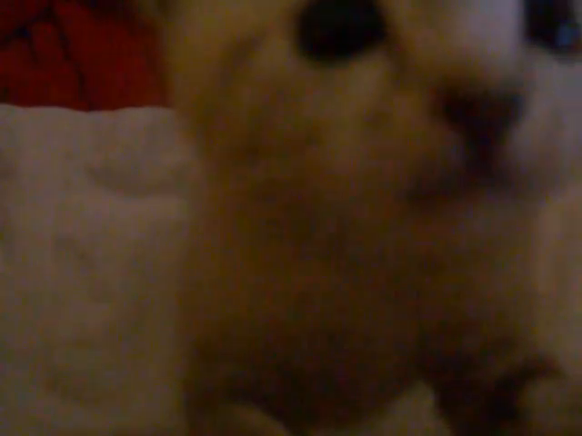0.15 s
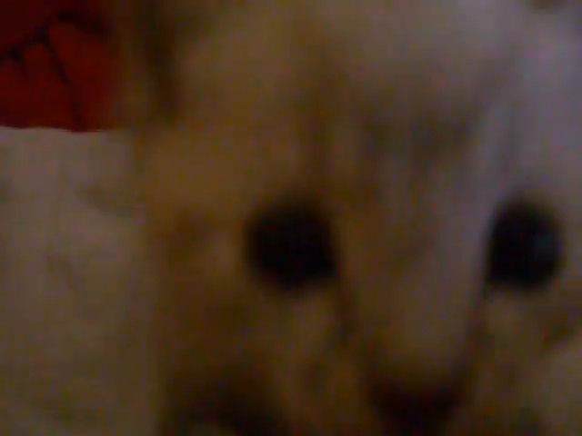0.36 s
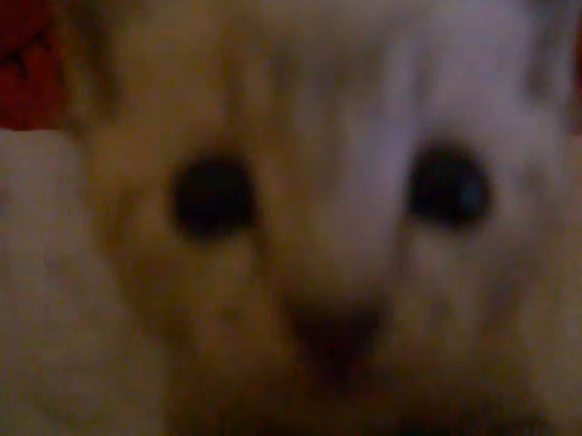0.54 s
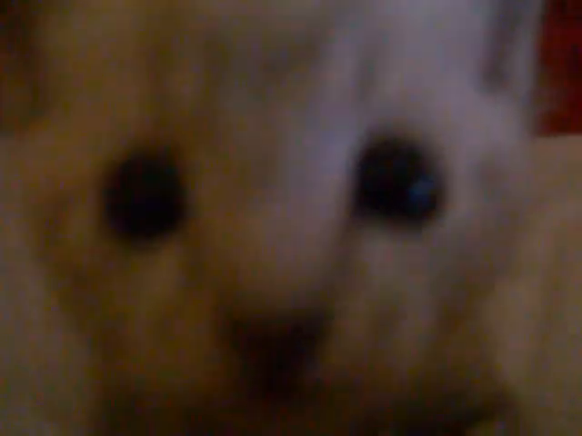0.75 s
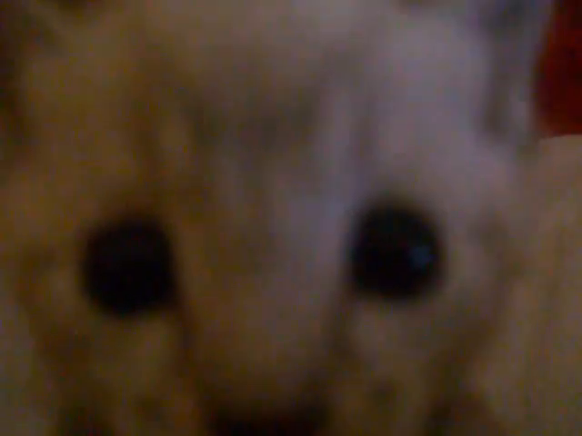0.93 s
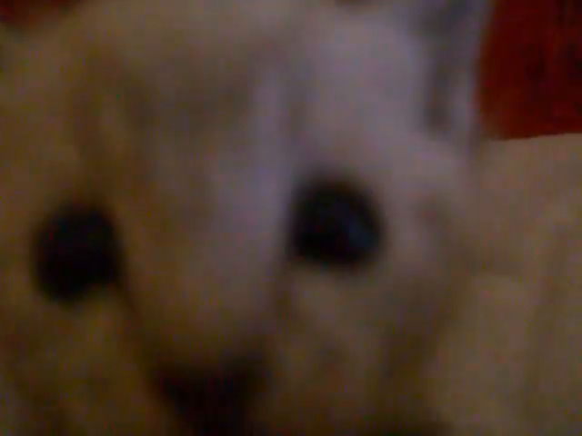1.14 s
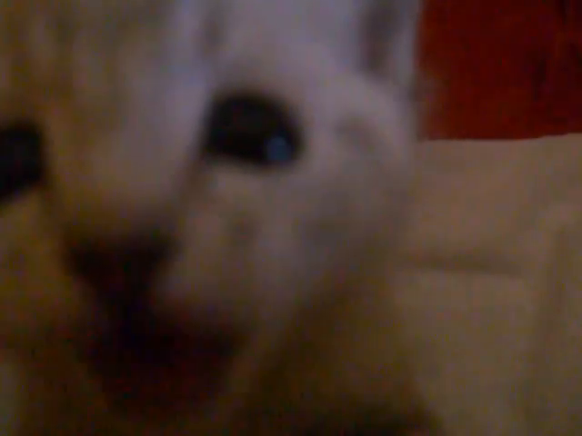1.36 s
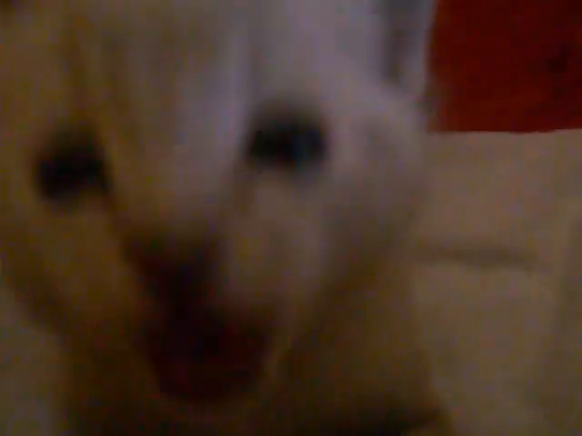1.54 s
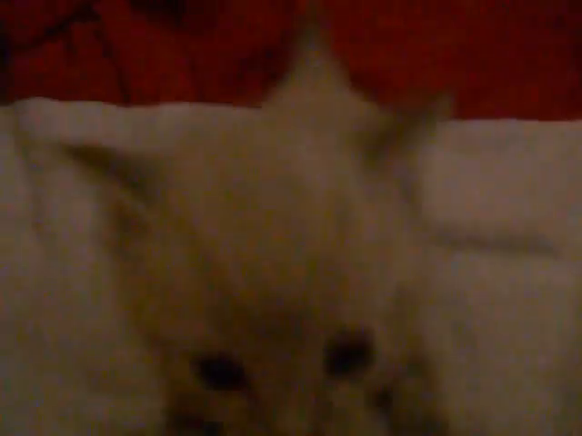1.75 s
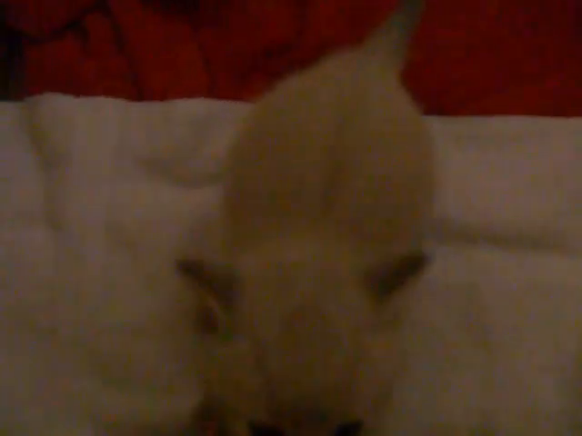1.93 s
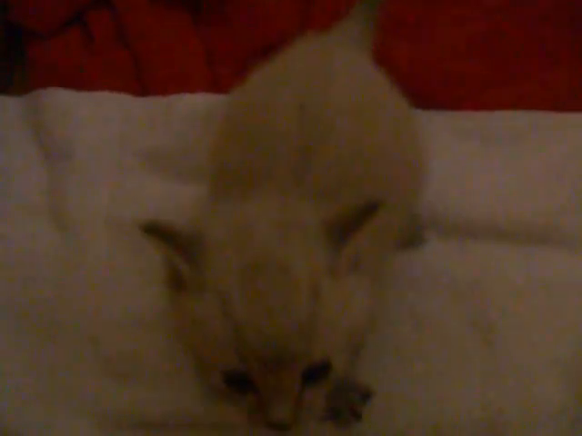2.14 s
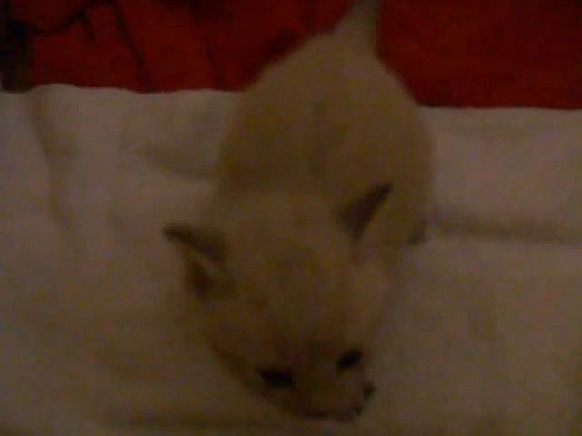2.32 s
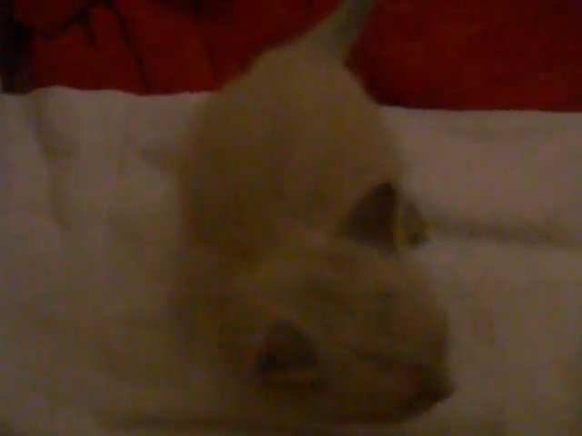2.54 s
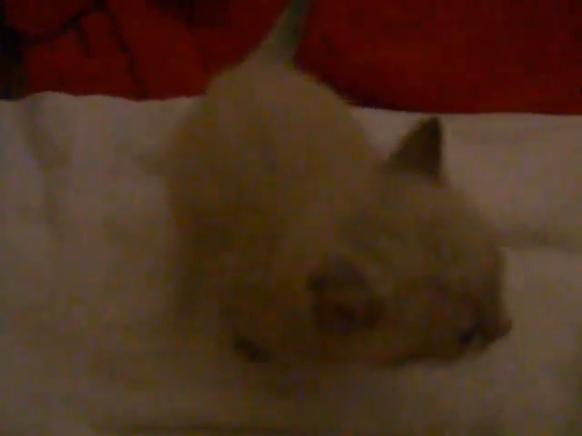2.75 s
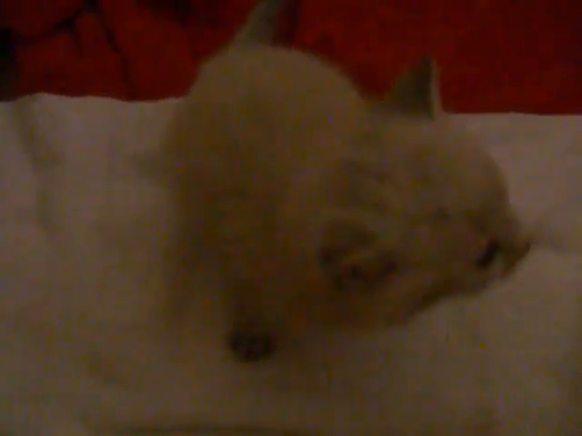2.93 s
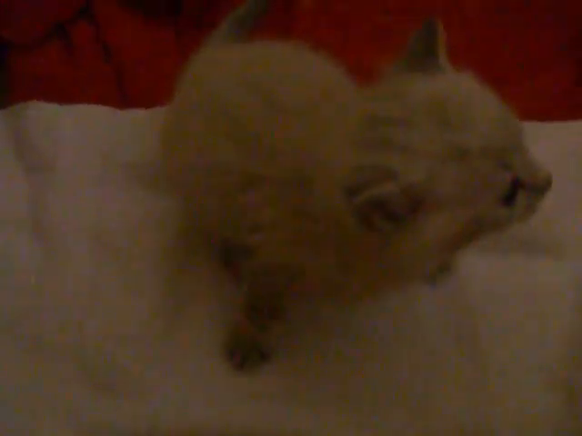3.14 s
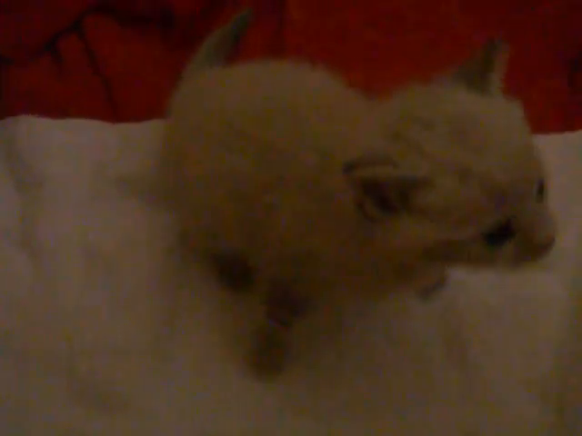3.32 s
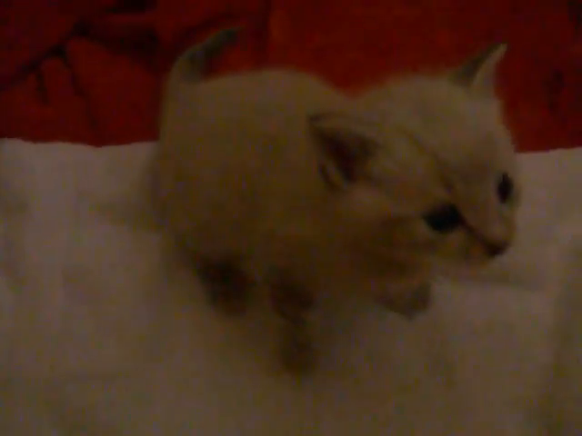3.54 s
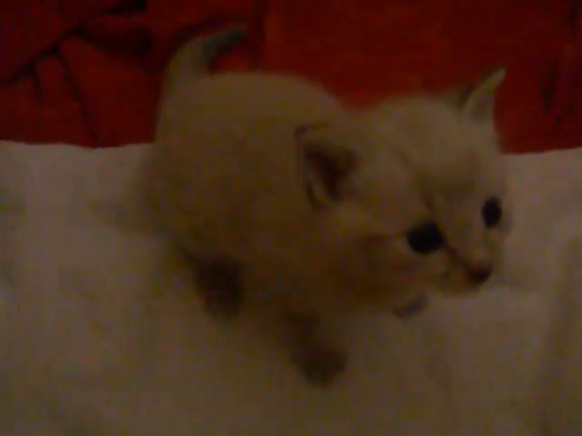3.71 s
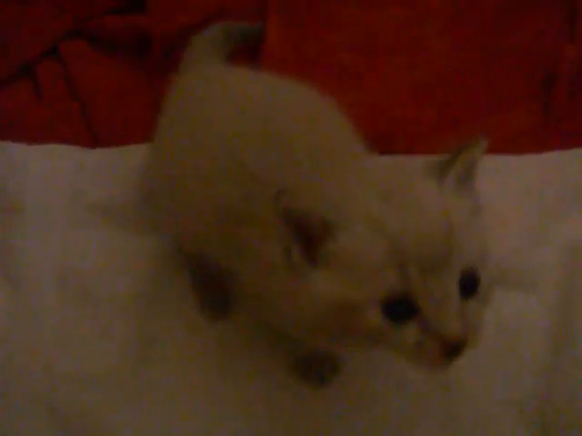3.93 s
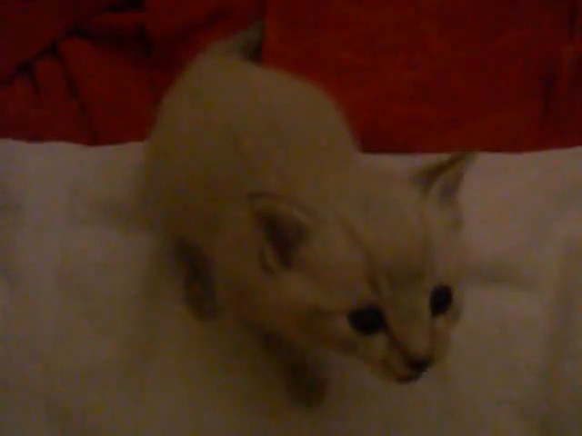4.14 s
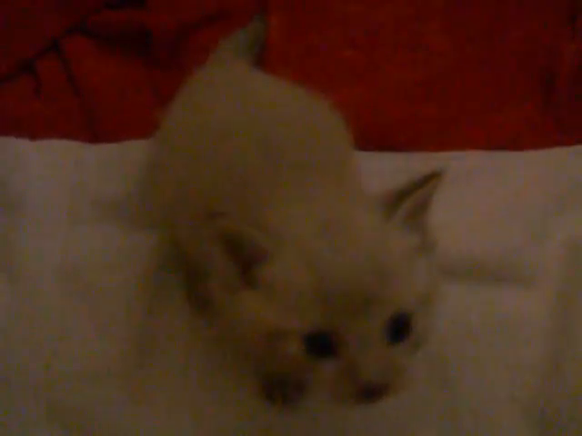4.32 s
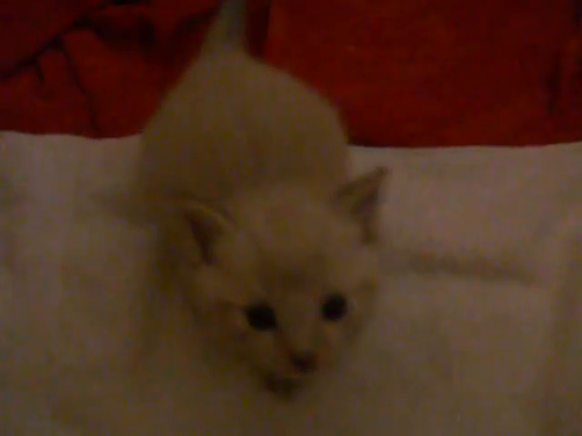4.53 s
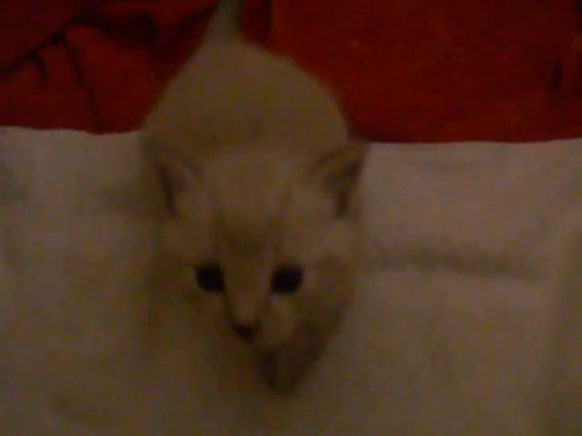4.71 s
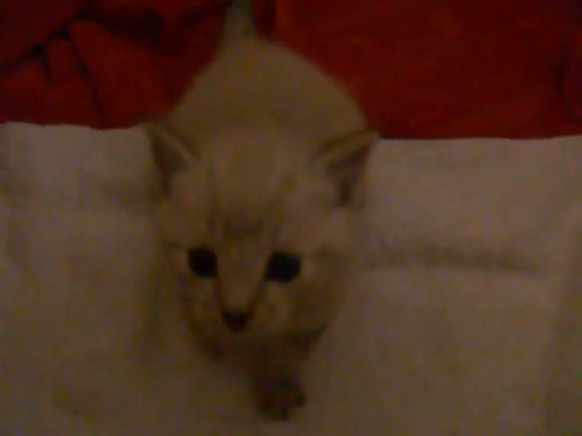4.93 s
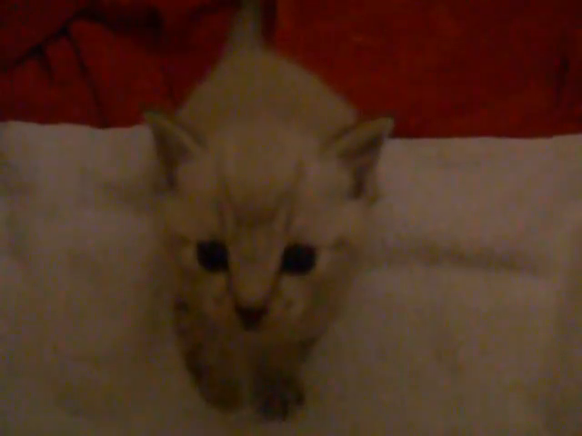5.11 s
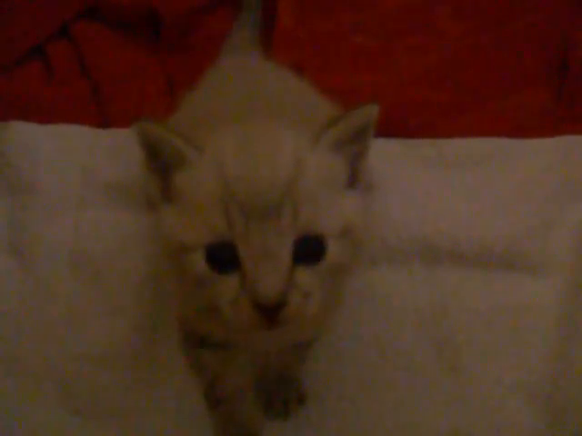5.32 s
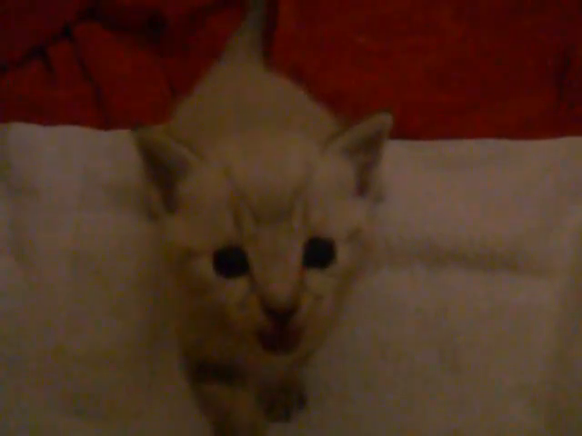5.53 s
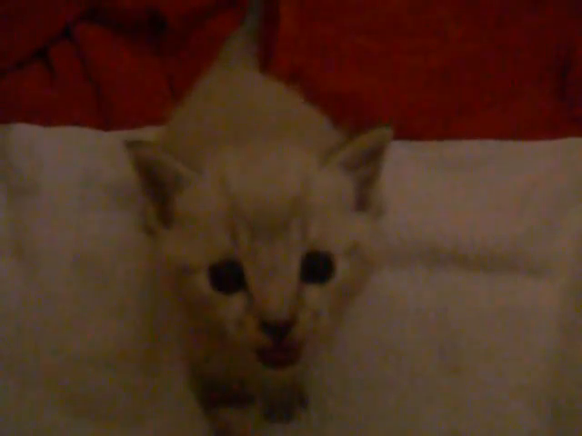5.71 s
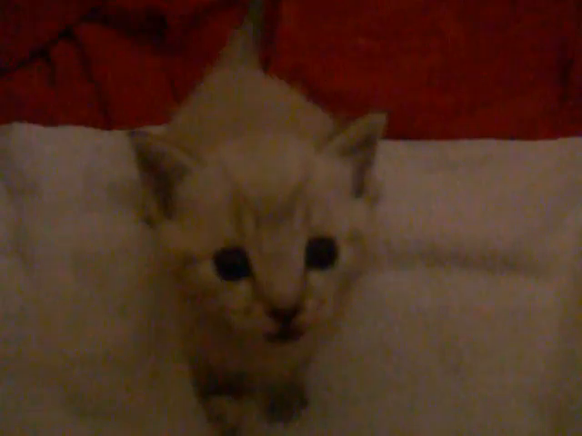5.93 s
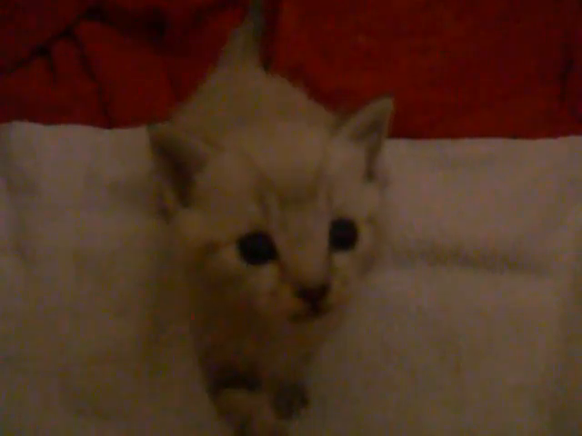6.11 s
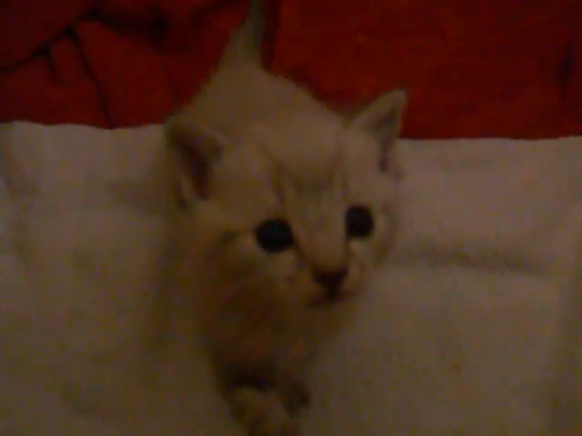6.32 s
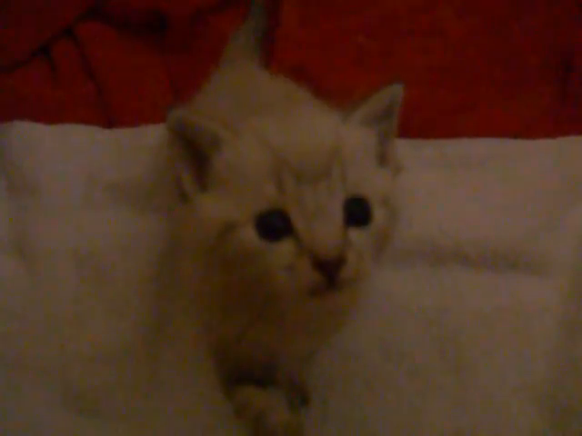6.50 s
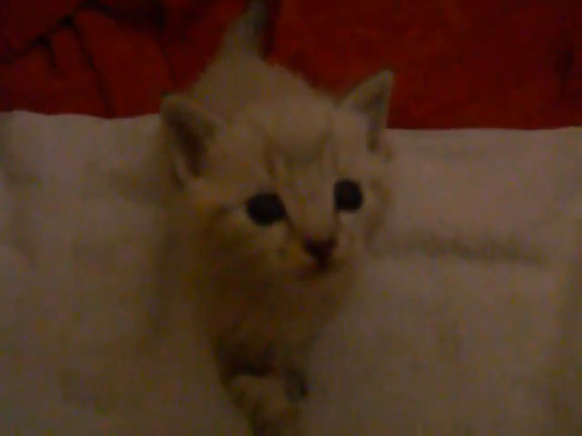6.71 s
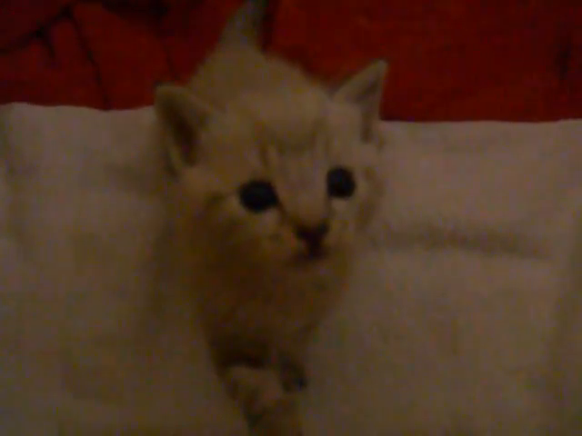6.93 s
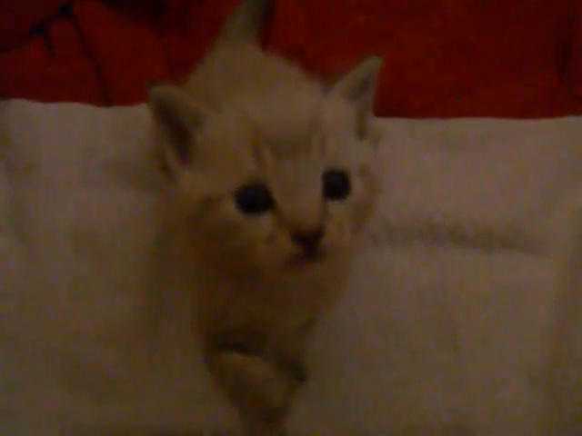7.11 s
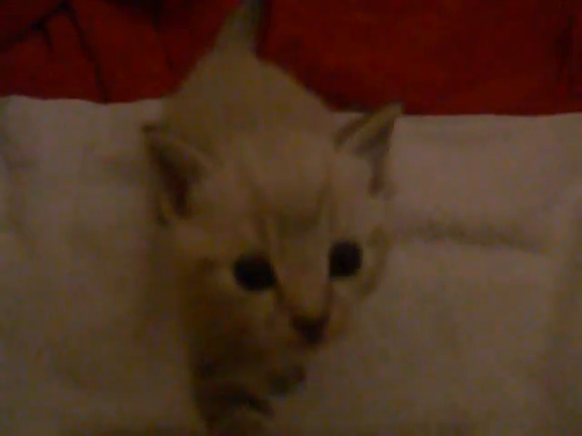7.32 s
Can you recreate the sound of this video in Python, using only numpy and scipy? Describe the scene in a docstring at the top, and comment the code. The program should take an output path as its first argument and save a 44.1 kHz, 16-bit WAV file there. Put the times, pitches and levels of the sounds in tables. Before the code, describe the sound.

Fur and cloth rustle and bump against the microphone, then a young kitten gives four thin, high mews over low hum and hiss.

```python
"""Fur and cloth brush and bump close by, over a low hum and hiss; then a young kitten mews four times
on a towel in a box, the first time right at the microphone. Friction is shaped noise and contacts are
decaying noise bursts. The voice is a harmonic series on an arching pitch: each mew is a thin, clean
arch that breaks into a rasp of side tones and runs out as a puff of fluttering, coloured air."""
import sys
import numpy as np
from scipy import signal
from scipy.fft import rfft, irfft
from scipy.io import wavfile
from scipy.ndimage import uniform_filter1d

SR = 44100
rng = np.random.default_rng(int(sys.argv[2]) if len(sys.argv) > 2 else 0)


def master_out(mix):
    """Clip the mix to full scale and print it as 16-bit PCM to the path in sys.argv[1]."""
    frames = np.transpose(np.atleast_2d(mix))
    ceiling = np.clip(frames, -1, 1)
    pcm = np.round(ceiling * 32767).astype(np.int16)
    wavfile.write(sys.argv[1], SR, pcm)


N = 328983
TIME, FREQ = np.arange(N) / SR, np.fft.rfftfreq(N, 1 / SR)
EDGE_HZ = 15900  # upper band limit


def amp(db):
    """Logarithmic level: decibels to amplitude gain."""
    return 10 ** (np.asarray(db) / 20)


def unit(x):
    """Normalisation: scales a signal to rms 1."""
    return x / np.sqrt(np.mean(x ** 2) + 1e-20)


def read(points, hz):
    """Spectral envelope: gain at the given frequencies, interpolated in dB over log frequency."""
    f, db = np.transpose(points)
    return amp(np.interp(np.log(hz + 1), np.log(f + 1), db))


def colour(x, points):
    """Linear filtering: multiplies the spectrum of x by an envelope, then scales to rms 1."""
    return unit(irfft(rfft(x) * read(points, FREQ), N))


def noise():
    """White noise: equal power at every frequency."""
    return rng.standard_normal(N)


def wander(hz):
    """Random modulation: noise under a Gaussian low-pass of the given rate, at rms 1."""
    return unit(irfft(rfft(noise()) * np.exp(-(FREQ / hz) ** 2), N))


def gate(start, end, edge):
    """Time window: one between two times, with short linear ramps."""
    return np.clip(np.minimum(TIME - start, end - TIME) / edge + .5, 0, 1)


def press(start, end, attack, release, arch_db=0, swell_db=0):
    """Exponential growth and decay: 60 dB in attack and release times, with an arched or swelling hold."""
    progress = np.clip((TIME - start) / (end - start), 0, 1)
    hold_db = swell_db * (progress - 1) - arch_db * (2 * progress - 1) ** 2
    away = np.maximum((start - TIME) / attack, (TIME - end) / release)
    return amp(hold_db - 60 * np.clip(away, 0, 2))


def dying(start, decay):
    """Damped impact: a 0.4 ms rise on an exponential decay of 60 dB in the decay time."""
    age = np.maximum(TIME - start, 0)
    return np.minimum(age / .0004, 1) * amp(-60 * np.minimum(age / decay, 2))


# colour of the steady rumble and hiss: (frequency [Hz], relative level [dB])
FLOOR_COLOUR = [(20, -17), (50, -6.5), (100, -6), (170, -4), (300, -11), (550, -12.5), (1200, -20.5),
                (1900, -23), (3000, -27.5), (6000, -30.5), (12200, -32), (13600, -23.5), (14800, -26.5),
                (15400, -24)]
# hum lines of the room: (frequency [Hz], width [Hz], level [dB], start [s])
HUM_LINES = [(57, 8.4, -62.5, 0), (128.8, 6.7, -54, 1), (163.7, 3.5, -55.5, 3.3), (254, 4.99, -54, 5.5),
             (259, 6, -61, 7), (366, 24.6, -57.5, 10)]
FLOOR_DB = -50


def background(waver=0.4):
    """Broadband noise plus narrowband lines: random frequency modulation gives each hum its width."""
    out = amp(FLOOR_DB) * colour(noise(), FLOOR_COLOUR)
    for hz, width, db, start in HUM_LINES:
        phase = 2 * np.pi * np.cumsum(hz + width / 2 * wander(width)) / SR
        line = np.sin(phase) * (1 + waver * wander(9.6))
        out += amp(db) * unit(line) * np.clip((TIME - start) / 0.011, 0, 1)
    return out


def box(x, wet_db=-22, t60=0.17):
    """Reverberation: convolution with decaying noise gives the padded box its faint, short tail."""
    t = np.arange(SR // 4) / SR
    tail = rng.standard_normal(len(t)) * amp(-60 * t / t60) * (t > .002)
    return x + amp(wet_db) * signal.fftconvolve(x, tail / np.linalg.norm(tail))[:N]


# sharp snags of cloth and claw: (time [s], level [dB], 60 dB decay [s])
SNAGS = [(0.272, -26, 0.02), (0.344, -31, 0.031), (0.37, -16.5, 0.0045), (.47, -25, 0.016),
         (.701, -34, 0.013), (.771, -54, .01), (0.795, -27, 0.01), (0.895, -17, 0.0038), (.963, -28, .005),
         (0.98, -21, 0.0079), (1.137, -22.5, 0.0066), (1.168, -31, 0.012), (1.909, -45, .012),
         (2.792, -30, 0.005), (7.251, -17, 0.015), (7.2566, -19.5, .012), (7.325, -35, .01),
         (7.343, -46, 0.021)]
# soft bumps on the housing: (time [s], level [dB], 60 dB decay [s], upper cutoff [Hz])
SOFT_BUMPS = [(0.474, -34.5, 0.23, 132), (0.496, -43, 0.16, 150), (0.795, -18.5, 0.023, 665),
              (0.802, -33, 0.38, 88), (0.813, -31.5, 0.24, 445), (7.249, -62, 0.09, 380),
              (7.29, -38.5, 0.2, 112)]


def knocks():
    """Impact excitation: sharp snags are broadband bursts, dull bumps are low-frequency bursts."""
    snag_colour = [(200, 4.0), (1500, -6.5), (4200, 1.5), (8000, -6.5), (13000, 1), (16000, 2.5)]  # Hz, dB
    snags = sum(amp(db) * dying(start, decay) for start, db, decay in SNAGS)
    out = snags * colour(noise(), snag_colour)
    for start, db, decay, top_hz in SOFT_BUMPS:
        band = signal.butter(2, [36, top_hz], "band", fs=SR, output="sos")
        thud = signal.sosfilt(band, noise())
        out += amp(db) * dying(start, decay) * unit(thud)
    return out


# short dry scrapes beside the housing: (start [s], end [s], level [dB])
DRY_SCRAPES = [(7.257, 7.261, -29.5), (7.275, 7.295, -30.5), (7.339, 7.369, -36.5), (7.399, 7.413, -44.5)]
# colour of the scrapes: (frequency [Hz], relative level [dB])
DRY_SCRAPE_COLOUR = [(180, -46), (300, 10), (546, -9), (994, -1.5), (1580, -14), (2170, -5), (2840, -14),
                     (4090, 0.5), (6520, -6), (7950, -12.5), (10900, -6), (14700, -8), (16000, -2.5)]
SCRAPE_ATTACK_S, SCRAPE_RELEASE_S, SCRAPE_ARCH_DB = .02, 0.055, 3


def scrape(grain_db=3, clump_db=3.0):
    """Stick-slip friction: something catches and drags near the housing as dry, grainy noise."""
    slips = noise() * amp(grain_db * wander(2200) + clump_db * wander(200))
    drag = np.zeros(N)
    for start, end, db in DRY_SCRAPES:
        drag += amp(db) * press(start, end, SCRAPE_ATTACK_S, SCRAPE_RELEASE_S, arch_db=SCRAPE_ARCH_DB)
    return drag * colour(slips, DRY_SCRAPE_COLOUR)


# cloth and fur strokes across the microphone:
# (start [s], end [s], attack [s], soft rub level [dB], fine fizz level [dB])
FUR_STROKES = [(0.133, 0.116, 0.2, -41, -40), (0.216, 0.238, 0.097, -33.5, -29),
               (0.277, .315, 0.023, -36, -31), (0.329, 0.365, .06, -44.5, -28),
               (0.357, 0.475, 0.087, -39.5, -40), (0.488, 0.506, 0.037, -42.5, -33),
               (0.555, 0.57, 0.12, -47.5, -41), (0.617, 0.654, 0.1, -36, -33),
               (0.692, 0.752, .035, -33, -33.5), (0.815, 0.856, .02, -39, -35),
               (0.92, 0.953, 0.16, -38, -37.5), (0.975, 1.121, .012, -38, -42),
               (1.017, 1.029, 0.032, -28, -21), (1.036, 1.058, .05, -35, -27.5),
               (1.223, 1.347, 0.23, -44, -42.5), (1.38, 1.558, 0.12, -41.5, -35),
               (1.563, 1.59, 0.055, -41, -20), (1.624, 1.757, 0.21, -36, -26.5),
               (1.73, 1.745, .06, -39, -19)]
# colour of the soft rub: (frequency [Hz], relative level [dB])
RUB_COLOUR = [(88, -52), (150, -20.5), (255, 2.5), (497, -7.5), (659, -1.5), (832, -7.5), (920, -1.5),
              (1220, -7), (1590, -6.5), (2450, -13.5), (4250, -19), (8000, -26), (10400, -60),
              (17600, -120)]
# colour of the fine fizz: (frequency [Hz], relative level [dB])
FIZZ_COLOUR = [(2500, -13), (4200, -1.5), (5200, -7), (8000, -14.5), (10300, -1.5), (11500, 0), (13300, 6),
               (15800, 3)]
STROKE_RELEASE_S, STROKE_ARCH_DB = 0.065, 1  # a stroke presses hardest in its middle
CONTACT_END_S, CONTACT_RUB_DB = 1.91, -55.5  # light touch between strokes, until the kitten backs off


def brushing(grain_db=3, clump_db=2, snaps_per_s=130, snap_db=-6):
    """Fibre friction: fibres catch and let go in clumps as rub and fizz, and single hairs snap free."""
    rub = amp(CONTACT_RUB_DB) * gate(0, CONTACT_END_S, 0.027)
    fizz = np.zeros(N)
    for start, end, attack, rub_db, fizz_db in FUR_STROKES:
        stroke = press(start, end, attack, STROKE_RELEASE_S, arch_db=STROKE_ARCH_DB)
        # incoherent strokes add in power
        rub = np.hypot(rub, amp(rub_db) * stroke)
        fizz = np.hypot(fizz, amp(fizz_db) * stroke)
    clumps = amp(clump_db * wander(190))
    soft = unit(clumps * noise() * amp(grain_db * wander(5300)))
    fine = unit(clumps * noise() * amp(grain_db * wander(5300)))
    snaps = unit(rng.uniform(-0.6, 1, N) * (rng.random(N) < snaps_per_s / SR))
    return rub * colour(soft + amp(snap_db) * snaps, RUB_COLOUR) + fizz * colour(fine, FIZZ_COLOUR)


# air through the open mouth as each mew ends:
# (start [s], end [s], level at the end [dB], swell from start to end [dB])
AIR_PUFFS = [(1.675, 1.748, -19.5, 4.5), (1.767, 1.886, -16.5, 4.5), (3.274, 3.274, -48, -1),
             (4.24, 4.37, -58.5, -14), (6.024, 6.051, -51, -0.5)]
# colour of the puffs: (frequency [Hz], relative level [dB])
AIR_PUFF_COLOUR = [(250, -11), (700, -13), (1300, -16), (2350, -5.5), (3000, -8.5), (4300, 4), (5300, 0.5),
                   (6700, -0.5), (8300, -10.5), (10500, -6.5), (12000, -3), (13300, -1), (16000, -4)]
PUFF_ATTACK_S, PUFF_RELEASE_S = 0.067, 0.04


def puffs(flutter_db=1.0):
    """Turbulent flow: the voice fails and only fluttering air hisses through the kitten's mouth."""
    air = colour(noise(), AIR_PUFF_COLOUR) * amp(flutter_db * wander(310))
    flow = np.zeros(N)
    for start, end, db, swell in AIR_PUFFS:
        flow += amp(db) * press(start, end, PUFF_ATTACK_S, PUFF_RELEASE_S, swell_db=swell)
    return air * flow


# the folds break into a second vibration:
# (start [s], end [s], level [dB], side tone at start [Hz], side tone at end [Hz], roughness [0-1])
FOLD_BREAKS = [(1.681, 1.757, -26.5, 2363, 2020, 0.89), (2.938, 2.973, -26, 2790, 2785, 0.27),
               (2.971, 3.038, -29.5, 2844, 2380, 0.74), (3.033, 3.113, -35, 2470, 2180, 0.64),
               (3.124, 3.146, -49, 2120, 2210, 0.2), (3.919, 3.922, -41.5, 1825, 1840, 0.25),
               (3.947, 3.953, -50, 1860, 1870, 1), (4.247, 4.335, -36.5, 2074, 1833, 0.84),
               (5.834, 5.848, -32.5, 2410, 2337, 0.48), (5.863, 5.905, -30, 2200, 2105, 0.5),
               (5.951, 6.019, -38, 2230, 1663, 0.76)]


def rasp(breaks, phase, lower_db, upper_db, double_db, spray_db):
    """Biphonation: a second fold vibration combines with the first into unsteady side tones."""
    out = np.zeros(N)
    drift_hz = 150 * wander(300)
    in_phase, quadrature = .4 * wander(550), .4 * wander(550)
    for start, end, db, from_hz, to_hz, rough in breaks:
        burst = gate(start, end, .006) * np.interp(TIME, [start, end], [1, .7])
        at = burst > 0
        side_hz = np.interp(TIME[at], [start, end], [from_hz, to_hz]) + rough * drift_hz[at]
        side = 2 * np.pi * np.cumsum(side_hz) / SR
        beat = side - phase[at]  # the slow second vibration
        tones = np.sin(side)
        tones += amp(lower_db) * np.sin(phase[at] - beat)
        tones += amp(upper_db) * np.sin(side + beat)
        tones += amp(double_db) * np.sin(side + 2 * phase[at])
        tones += amp(spray_db) * np.sin(2 * side) * (1 + 3 * in_phase[at])
        chaos = rough * (in_phase[at] * np.sin(side) + quadrature[at] * np.cos(side))
        out[at] += np.sqrt(2) * amp(db) * burst[at] * (tones + chaos)
    return out


# course of each mew: (time [s], pitch [Hz], first-harmonic level [dB], brightness [dB]);
# brightness sets the upper harmonics against the first, high when the mouth is wide
FIRST_MEW = [(1.347, 1246, -20.5, -16), (1.357, 1330, -23.5, -28), (1.365, 1450, -30.5, -20),
             (1.375, 1626, -18, -17), (1.413, 1966, -22.5, 3.5), (1.443, 2018, -21, 3.5),
             (1.473, 1980, -20, 3), (1.503, 1870, -18, 0), (1.553, 1857, -18.5, -1),
             (1.575, 1808, -17, -10.5), (1.603, 1794, -17, -12.5), (1.641, 1782, -16.5, -11.5),
             (1.675, 1663, -23, -8.5), (1.691, 1539, -21, -1), (1.712, 1484, -25.5, 12)]
SECOND_MEW = [(2.808, 1508, -32, -14), (2.826, 1523, -34, -4), (2.84, 1762, -34, 5), (2.88, 2010, -32.5, 5),
              (2.908, 1957, -31.5, -2), (3.01, 1695, -34, -8), (3.07, 1778, -30.5, -17),
              (3.084, 1484, -30, -21), (3.102, 1463, -31, -30), (3.116, 1806, -35, -19),
              (3.202, 1774, -41.5, -12.5), (3.226, 1696, -40, -17), (3.248, 1485, -38, -27),
              (3.26, 1380, -37.5, -13)]
THIRD_MEW = [(3.945, 1761, -32, -29), (3.953, 1744, -32.5, -20), (3.991, 1787, -22.5, -21),
             (4.063, 1815, -20.5, -15), (4.129, 1809, -20, -17), (4.169, 1764, -20.5, -21),
             (4.241, 1637, -31.5, -13.5), (4.251, 1696, -32, -10), (4.261, 1408, -31.5, -12),
             (4.311, 1407, -34, -21), (4.33, 1450, -41, -17)]
FOURTH_MEW = [(5.488, 1580, -26.5, -27), (5.506, 1691, -21, -19), (5.54, 1810, -22, -4.5),
              (5.566, 1820, -25, 0), (5.59, 1785, -20.5, -8), (5.736, 1724, -20.5, -16.5),
              (5.85, 1625, -28, -14.5), (5.89, 1742, -30.5, -14), (5.908, 1618, -30.5, -17),
              (5.922, 1680, -29, -24), (5.942, 1590, -31.5, -22), (5.966, 1606, -31, -22),
              (6.004, 1176, -34, -19), (6.016, 1220, -34, -9)]
# throat resonances that harmonics 2 and 3 sweep through, then the same with the head turned aside:
# (frequency [Hz], gain [dB])
THROAT_GAIN = [(2600, 14), (3000, 10.5), (3300, 5), (3650, 2), (4050, -3), (4600, -15), (5000, 5.5),
               (5400, 7), (5700, -4.5), (6050, -2.5)]
TURNED_THROAT_GAIN = [(2600, 5), (3000, 7.5), (3300, 3), (3650, -7), (4050, -13.5), (4600, -3), (5000, -5),
                      (5400, -8), (5700, -1.5), (6050, 5.5)]
# overtone colour with the mouth at the microphone, further off, and with the head turned aside:
# (frequency [Hz], relative level [dB])
NEAR_COLOUR = [(5500, 6), (8200, -10), (10000, -1), (11200, 8), (12100, 5.5), (13200, 7), (14200, -11),
               (15400, -33)]
FAR_COLOUR = [(5500, -24), (7000, 4), (8000, 4), (9000, -8), (10800, 8), (12400, 7), (14200, -4.5),
              (16000, 7)]
TURNED_COLOUR = [(5500, 13), (7000, -3), (8000, 9), (9000, -28), (10800, 4), (12400, 4), (14200, 10),
                 (16000, 0)]
# air escaping with the voice: (frequency [Hz], relative level [dB])
LEAK_COLOUR = [(1200, -1), (2500, 1.5), (4500, -1.5), (8500, -0.5), (12000, 1.5), (14500, 2), (16000, -1.5)]
SECOND_SLOPE, THIRD_SLOPE = 1.41, 1  # dB that these harmonics gain for each dB of brightness
GLIDE_S = 0.015  # the folds need this long to change pitch
OPEN_S = 0.032  # the overtones and the air come in as the mouth opens


def mew(course, throat, overtones, second_db, third_db, overtone_db, air_db, overtone_slope=0.26,
        dull_db=-13, flutter_db=1, spray_db=-28, jitter=0.00262, rasp_jitter=0.058, shimmer=0.032,
        lower_db=-10, upper_db=-19, double_db=-24, throat_hz=1050):
    """Source and filter: fold harmonics on an arching pitch, shaped by throat and mouth, with rasps."""
    s, pitch, level_db, bright_db = np.transpose(course)
    on = gate(s[0] + .002, s[-1], .004)
    live = on > 0
    t = TIME[live]
    breaks = [r for r in FOLD_BREAKS if s[0] - .05 < r[0] < s[-1]]
    broken = np.minimum(sum(gate(start, end, .005) * rough for start, end, *_, rough in breaks), 1)
    hz = uniform_filter1d(np.interp(TIME, s, pitch), int(GLIDE_S * SR))
    hz *= 1 + jitter * wander(136) + rasp_jitter * broken * wander(256)
    phase = 2 * np.pi * np.cumsum(hz) / SR

    # upper harmonics rise as the mouth opens, each at its own slope; a rasp changes their level by dull_db
    first = amp(np.interp(t, s, level_db))
    bright = np.interp(t, s, bright_db) + (dull_db * broken + flutter_db * wander(42))[live]
    second = first * amp(second_db + SECOND_SLOPE * bright) * read(throat, 2 * hz[live])
    third = first * amp(third_db + THIRD_SLOPE * bright) * read(throat, 3 * hz[live])
    top = first * amp(overtone_slope * bright) * np.clip((t - s[0]) / OPEN_S, 0, 1)
    overtone_hz = np.arange(4, 12)[:, None] * hz[live]
    high = read(overtones, overtone_hz) * (overtone_hz < EDGE_HZ)
    high *= amp(overtone_db) * top / np.linalg.norm(high, axis=0)

    voice = np.zeros(N)
    for order, gain in enumerate([first, second, third, *high], 1):
        voice[live] += np.sqrt(2) * gain * np.sin(order * phase[live])
    voice *= 1 + shimmer * wander(110)
    # in a rasp the main vibration stutters as well
    voice *= 1 - .3 * broken + .5 * broken * wander(330)
    # air leaks through the folds once a cycle
    leak = colour(noise(), LEAK_COLOUR)[live] * (1 + .5 * np.cos(phase[live]))
    voice[live] += amp(air_db) * top * leak
    voice *= on
    voice += rasp(breaks, phase, lower_db, upper_db, double_db, spray_db)
    # the tiny throat radiates almost nothing below its first resonance
    radiation = 1 - 1 / (1 + (FREQ / throat_hz) ** 12)
    return irfft(rfft(voice) * radiation, N)


def scene():
    """Superposition: kitten, friction and contacts share the box tail, and the room is added dry."""
    kitten = mew(FIRST_MEW, THROAT_GAIN, NEAR_COLOUR, second_db=-5.5, third_db=-9.5, overtone_db=-2.5,
                 overtone_slope=1.28, air_db=-16.5, dull_db=-16.5, rasp_jitter=0.056, lower_db=-18)
    kitten += mew(SECOND_MEW, TURNED_THROAT_GAIN, TURNED_COLOUR, second_db=3.0, third_db=-4.5,
                  overtone_db=-12.5, overtone_slope=0.47, air_db=-11.5, dull_db=-0.5, flutter_db=2.5,
                  spray_db=-23, rasp_jitter=0.0396, lower_db=-6.5, upper_db=-16.5, double_db=-26.0,
                  throat_hz=1200)
    kitten += mew(THIRD_MEW, THROAT_GAIN, FAR_COLOUR, second_db=-2, third_db=-4.0, overtone_db=-19,
                  overtone_slope=0.34, air_db=-22.5, shimmer=0.02, lower_db=-6.5, double_db=-29,
                  throat_hz=950)
    kitten += mew(FOURTH_MEW, THROAT_GAIN, FAR_COLOUR, second_db=-1, third_db=-6.5, overtone_db=-20,
                  air_db=-18.5, lower_db=-10, double_db=-19, throat_hz=806)
    close = kitten + puffs() + brushing() + scrape() + knocks()
    return (box(close) + background())[None]


# notches of the microphone housing: (frequency [Hz], half-width [Hz], depth [dB])
HOUSING_NOTCHES = [(5814, 38, -22.5), (7900, 103, -9.5), (11470, 49, -26)]


def record(dry, whine_hz=5715, whine_spread_hz=22, whine_db=-70):
    """Transducer response: the housing notches the treble, electronics whine faintly, the band is limited."""
    housing_db = sum(db / (1 + ((FREQ - hz) / width) ** 2) for hz, width, db in HOUSING_NOTCHES)
    whine_phase = 2 * np.pi * np.cumsum(whine_hz + whine_spread_hz * wander(33)) / SR
    whine = unit(np.sin(whine_phase))
    sound = irfft(rfft(dry) * amp(housing_db), N) + amp(whine_db) * whine
    low_pass = signal.firwin(511, EDGE_HZ, window=("kaiser", 9), fs=SR)
    return signal.oaconvolve(sound, low_pass[None], "same")


dry = scene()
out = record(dry)
master_out(out)
```